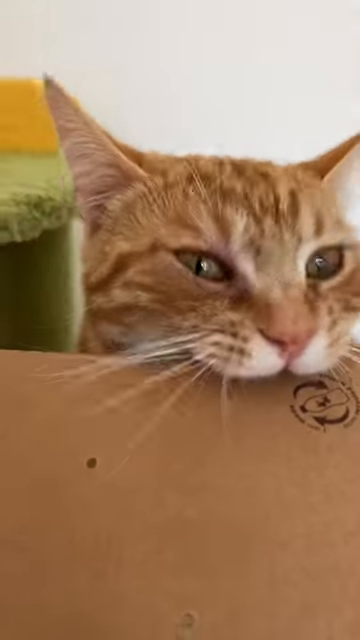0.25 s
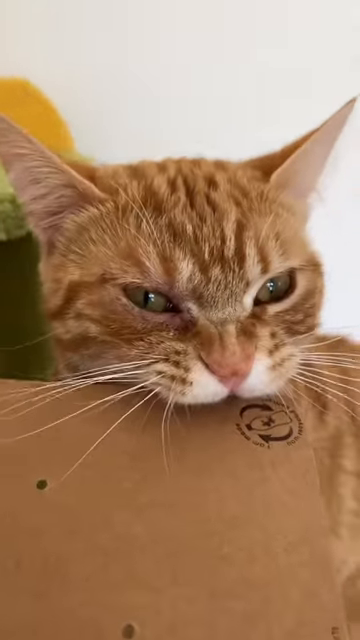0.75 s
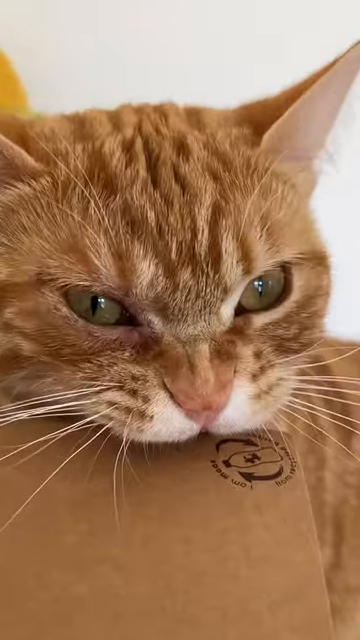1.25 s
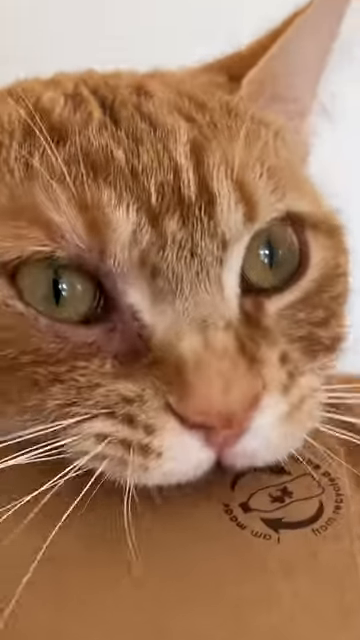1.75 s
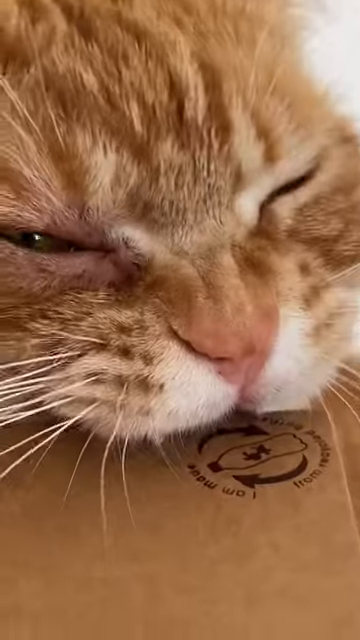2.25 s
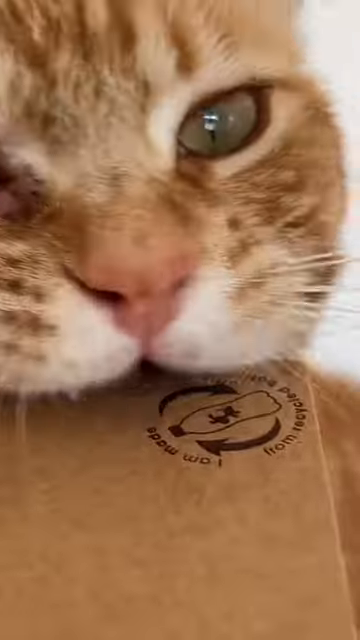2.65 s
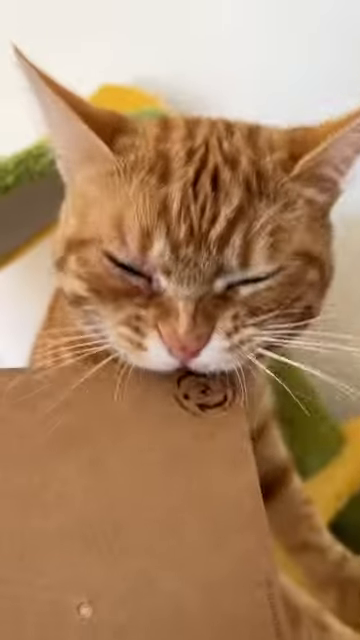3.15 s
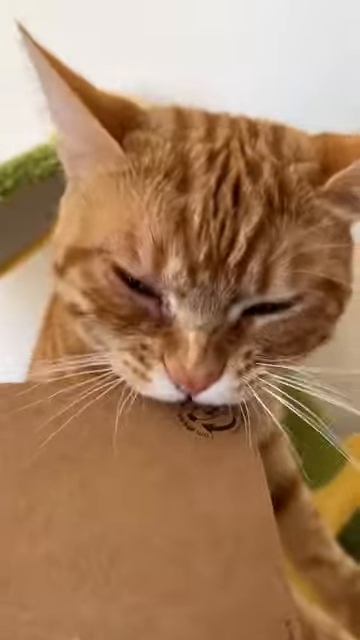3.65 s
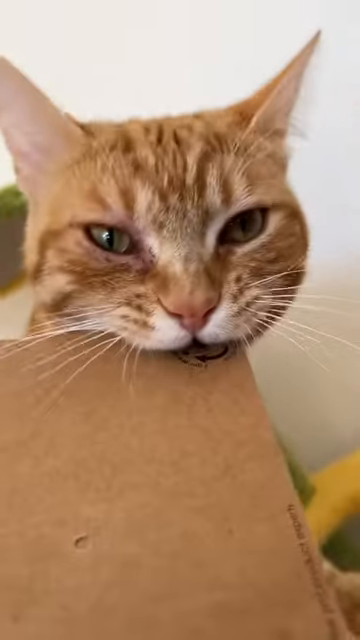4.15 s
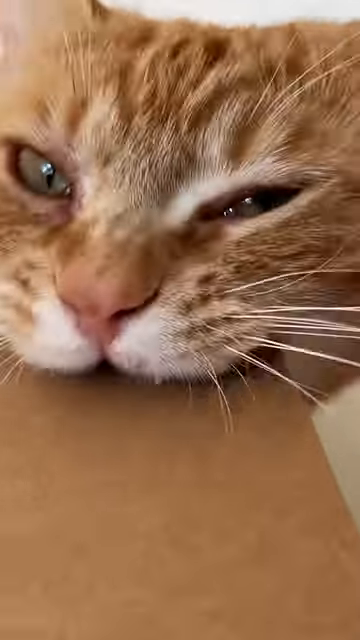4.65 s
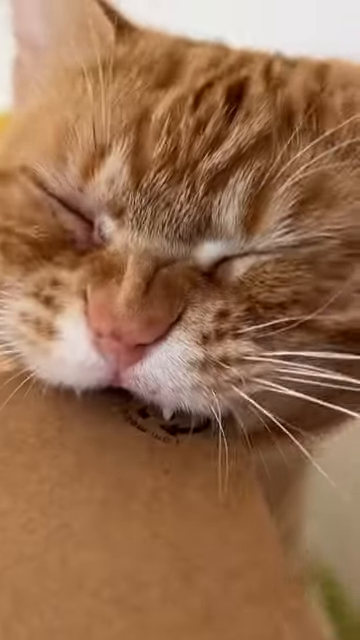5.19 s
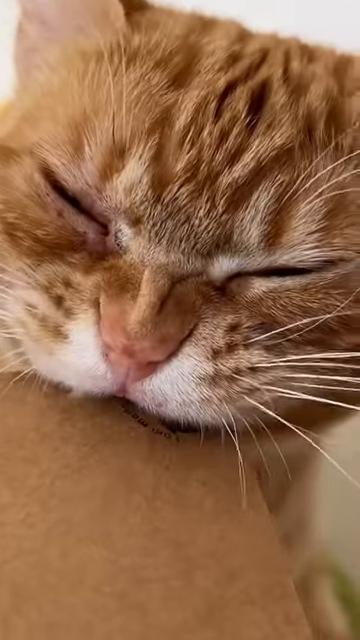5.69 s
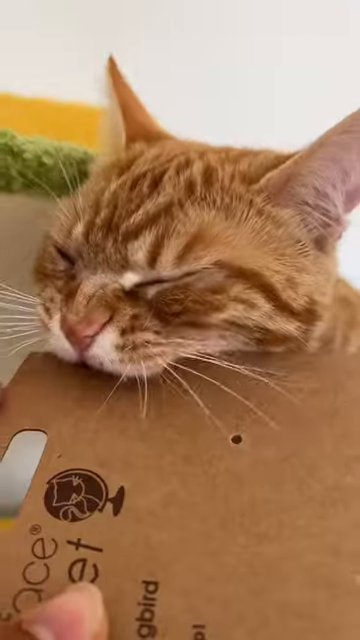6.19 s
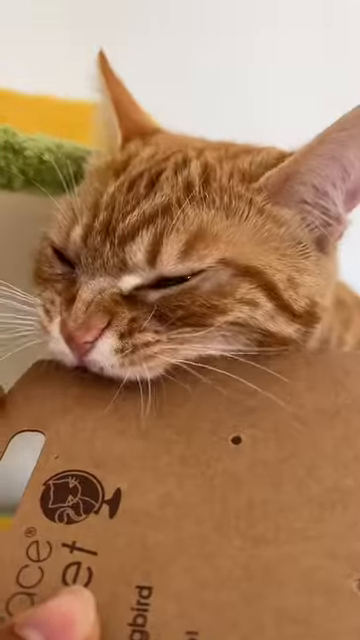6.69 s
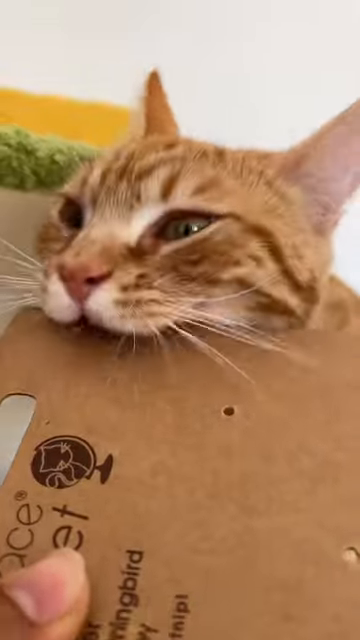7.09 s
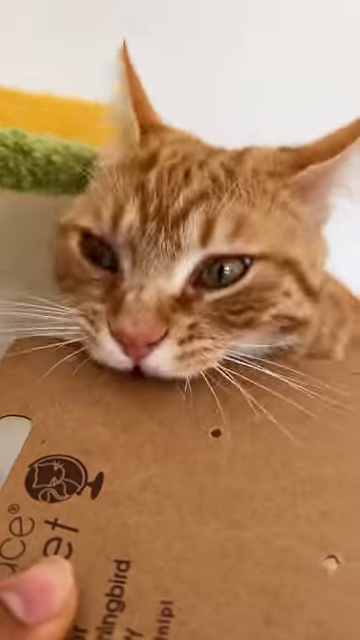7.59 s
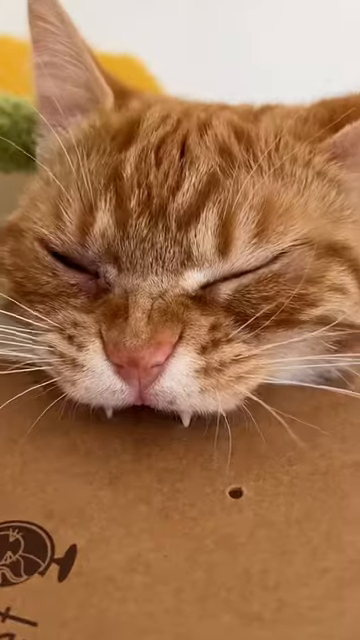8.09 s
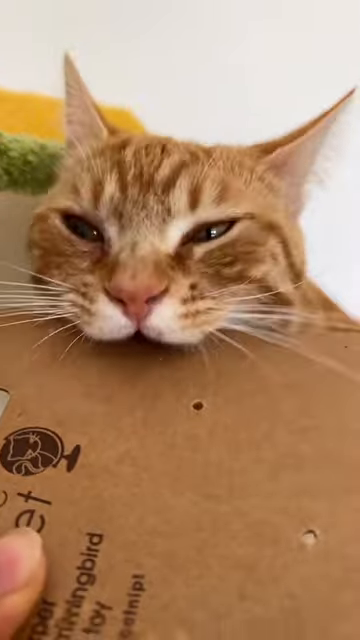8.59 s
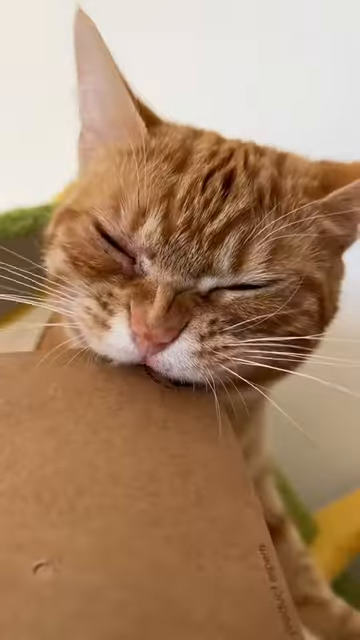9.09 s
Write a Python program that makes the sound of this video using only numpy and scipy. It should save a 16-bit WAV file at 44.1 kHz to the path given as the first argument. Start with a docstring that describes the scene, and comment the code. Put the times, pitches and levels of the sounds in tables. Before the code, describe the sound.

A cat gnaws the edge of a stiff cardboard sheet, hollow knocks giving way to scraping and bursts of crunchy tearing in a quiet room.

```python
"""A small room, where a cat chews the edge of a stiff cardboard sheet held close to a phone.
Teeth knock the sheet: filtered, dispersed impulses give the knock, the crack and a low flexing thump.
Teeth also drag over the paper and tear its fibres: random fractures and friction noise, spectrally shaped.
Fur scuffs the board as soft grainy noise, and the held sheet rumbles as the jaw pulls it.
A short reverberant tail and a faint diffuse hush lie behind."""
import sys
import numpy as np
from scipy import signal
from scipy.fft import rfft, irfft, next_fast_len
from scipy.io import wavfile
from scipy.ndimage import uniform_filter1d, map_coordinates

SR = 44100
rng = np.random.default_rng(int(sys.argv[2]) if len(sys.argv) > 2 else 0)


def store_pcm(level_fs):
    """Save levels as 16-bit WAV."""
    pcm = np.round(np.clip(level_fs, -1, 1) * 32767).astype(np.int16)
    wavfile.write(sys.argv[1], SR, np.atleast_2d(pcm).T)


N = 411894
TIME = np.arange(N) / SR  # s

# Teeth and chin striking the sheet. Each row: time in seconds, knock level in dB, knock centre in Hz,
# crack level in dB, thump level in dB, thump centre in Hz.
KNOCKS = [(0.2386, -28.5, 640, -49, -22.5, 101.3), (0.2531, -12.5, 1010, -28.5, -12.5, 149),
          (1.649, -45, 825, -51, -30, 103), (1.992, -14, 850, -31, -13, 166.5),
          (2.003, -13, 1106, -15, -17.5, 60), (2.8595, -11, 1090, -21.5, -23.5, 202),
          (3.995, -21, 543, -45, -16.5, 132), (4.011, -22, 710, -34, -16.5, 120),
          (4.026, -13, 1120, -22, -12.5, 125), (4.535, -18.5, 1110, -35, -25.5, 168),
          (4.545, -23, 578, -38.5, -15, 158), (4.579, -35.5, 851, -54, -20, 72.5),
          (4.8373, -16, 840, -32, -13, 158), (4.889, -20, 965, -31.5, -7, 103),
          (6.951, -37, 653, -39.5, -25.5, 93), (6.9953, -18.5, 514, -23, -17, 232),
          (7.004, -15.5, 725, -20, -19, 105), (7.056, -23.5, 430, -40, -24, 95),
          (7.402, -12, 559.7, -22, -18.5, 202), (7.412, -15, 1000, -24.5, -12, 90),
          (7.7415, -14.5, 1150, -25, -12, 115), (8.666, -20, 558, -34, -24, 142),
          (8.6806, -14.5, 1140, -23.5, -13.5, 128), (8.986, -16.5, 1106, -28, -26, 76)]
# Fibres giving way under a tooth. Each row: middle in seconds, length in seconds,
# crackle level in dB before a lift of 1 dB, thump level in dB.
RIPS = [(1.133, .006, -39.5, -43.5), (1.395, 0.0069, -35.5, -46.5), (3.492, 0.012, -31, -36.5),
        (3.682, .014, -42.5, -17.5), (5.412, 0.03, -20.5, -30.5), (5.461, .033, -22, -43),
        (5.498, 0.016, -13, -14.5), (5.625, 0.019, -18, -8), (5.715, 0.0076, -29.5, -29),
        (5.758, .011, -21.5, -17), (5.822, .012, -27.5, -46.5), (5.858, 0.013, -25, -32.5),
        (5.902, .017, -20.5, -28), (5.967, 0.016, -28.5, -38.5), (6.015, 0.089, -26, -42.5),
        (6.19, .011, -28, -26.5), (6.379, 0.033, -29.5, -33), (6.454, 0.013, -26.5, -42.5),
        (6.531, 0.019, -15.5, -33), (6.576, 0.026, -22, -28), (6.62, 0.0077, -14, -16.5),
        (8.816, 0.036, -23.5, -42.5), (8.86, 0.019, -15, -15), (8.987, 0.011, -17, -8.5),
        (9.076, 0.0088, -30, -31.5), (9.118, 0.0085, -21, -18.5), (9.185, 0.0087, -26.5, -48),
        (9.221, 0.0067, -26, -29.5), (9.261, 0.017, -19, -28.5)]
# Single fibres snapping. Each row: time in seconds, level in dB, centre in Hz before a tilt to the bass.
SNAPS = [(0.347, -49.5, 2770), (0.485, -50, 2650), (.715, -50.5, 4900), (.976, -48, 5270),
         (1.103, -38.5, 5950), (1.22, -41.5, 5930), (1.319, -46, 4470), (1.531, -48.5, 6450),
         (1.619, -43.5, 1805), (1.781, -35.5, 6770), (2.254, -48.5, 4970), (2.936, -42.5, 2770),
         (3.817, -50.5, 6840), (4.095, -36, 3160), (4.196, -42, 1760), (4.406, -45.5, 7300),
         (4.634, -35.5, 2160), (5.626, -18.5, 3100), (5.898, -27.5, 3830), (5.966, -29, 6340),
         (6.04, -27.5, 8440), (6.183, -26, 5400), (6.23, -34.5, 4320), (6.292, -28, 3480),
         (6.784, -51.5, 3040), (7.0043, -20, 4900), (7.26, -45.5, 4220), (7.595, -32, 5000),
         (7.844, -31, 2710), (7.969, -31, 2640), (8.415, -44.5, 2150), (8.781, -29.5, 3810),
         (9.258, -22.5, 5210)]
# Teeth dragging over the paper face. Each row: start, hardest moment and end in seconds,
# level in dB before a lift of 3.5 dB, lower resonance in Hz, its gain in dB before the depth of colouring,
# upper resonance in Hz, its gain in dB likewise, judder in dB per unit of wobble.
DRAGS = [(0.625, 1.047, 1.4, -56.5, 2720, 5, 5550, 9, 11),
         (2.951, 3.057, 3.09, -45, 2320, 14.5, 4300, 1.5, -0.5),
         (3.164, 3.232, 3.45, -38, 2460, 9.5, 7650, -11, 0),
         (4.285, 4.354, 4.42, -60.5, 2350, 13.5, 5800, 4, 0),
         (4.644, 4.665, 5.1, -49.5, 2240, 17.5, 5800, -5, 7),
         (4.94, 5.094, 5.12, -48.5, 2110, 9.5, 4600, 3, 2),
         (5.11, 5.195, 5.43, -34.5, 2246, 14, 7400, 14, 1),
         (6.162, 6.508, 6.64, -39, 2410, 6.5, 4320, 11, 5),
         (7.01, 7.03, 7.16, -45, 2400, -17, 5380, 5, 0.5),
         (7.96, 8.055, 8.36, -28, 2360, 12.5, 4300, -2, 1)]
# The jaw clamping down. Each row: start, hardest moment and end in seconds, fibre crackle in dB
# before a lift of 2.5 dB, rumble of the pulled sheet in dB before a lift of 1 dB.
BITES = [(0.038, 0.057, 0.09, -56, -48), (0.592, 0.698, .8, -59.5, -38.5), (0.812, 1.1, 1.22, -53.5, -34.5),
         (1.25, 1.33, 1.546, -60.5, -35), (1.775, 1.805, 1.9, -64.5, -45), (2.22, 2.39, 2.423, -53, -35.5),
         (2.65, 2.69, 2.73, -53.5, -37), (3.107, 3.3, 3.49, -41, -39.5), (3.55, 3.604, 3.69, -60, -42),
         (3.804, 3.9, 3.97, -62, -40.5), (4.1, 4.66, 4.74, -61, -43.5), (5.12, 5.424, 5.72, -39, -41.5),
         (5.62, 5.925, 6.145, -39, -41), (6.16, 6.398, 6.58, -40.5, -39.5),
         (7.25, 7.56, 7.68, -59.5, -44.5), (7.86, 8.098, 8.48, -49.5, -46.5),
         (8.948, 9.301, 9.92, -35.5, -38)]
# The muzzle brushing along the sheet. Each row: middle in seconds, length in seconds, level in dB,
# centre of the passed band in Hz.
RUBS = [(.246, 0.0072, -27, 735), (0.504, 0.17, -56, 1240), (1.64, 0.028, -40, 1000),
        (2.382, 0.017, -36.5, 496), (2.683, 0.038, -23, 527), (2.846, 0.023, -26.5, 710),
        (4.08, 0.081, -43.5, 1200), (4.689, 0.071, -47, 1460), (7.054, .055, -27.5, 450),
        (7.127, 0.12, -40, 580), (7.355, 0.11, -51.5, 694), (7.623, 0.024, -32, 1020),
        (7.68, 0.025, -31, 614), (8.494, 0.041, -42.5, 1550)]
# Lingering modes of the sheet. Each row: frequency in Hz, level against the knock in dB, t60 in seconds.
SHEET_MODES = [(213.6, -12.5, 0.12), (1048, -17, 0.13), (1645, -18.5, 0.033)]

# Relative spectra of the struck board, its crack, the fibres, the torn layers, the paper face, the fur,
# the pulled sheet and the hush. Each row: frequency in Hz, density in dB per Hz.
BOARD_SPECTRUM = [(150, 11), (220, 2.5), (330, 1.5), (500, 3), (700, -8), (1030, 1.5), (1300, -7),
                  (1640, -4), (2300, -10.5), (2900, -10.5), (6000, -23)]
CRACK_SPECTRUM = [(1200, -32), (2400, 13), (3000, -2), (5600, 3.5), (8000, -10.5), (12000, -18.5),
                  (16000, -30.5)]
FIBRE_SPECTRUM = [(300, -6), (1000, 1), (1800, 2), (2700, 7), (3500, -0.5), (4400, -1.5), (5000, -5.5),
                  (5900, 4.5), (8800, -5), (11700, 1), (12800, -11.5), (15800, -26)]
TORN_SPECTRUM = [(120, 3), (300, 0), (450, 4), (650, -0.5), (950, 3.5), (1300, -9), (1700, 4),
                 (3000, -21.5)]
PAPER_SPECTRUM = [(200, -1), (700, -10), (1500, 0.5), (2500, 4.5), (3400, 1.5), (4500, -0.5), (5200, -0.5),
                  (6200, -2.5), (8000, -15.5), (9000, -18), (11000, -14), (13000, -48)]
FUR_SPECTRUM = [(80, 2.5), (280, 2), (500, -5.5), (1000, -11), (2000, -13), (3500, -15.5), (7000, -13.5),
                (12000, -35.5)]
RUMBLE_SPECTRUM = [(20, -30), (42, 7), (65, 7.5), (115, 0), (170, -10), (280, -24), (600, -54),
                   (2000, -72.5)]
AIR_SPECTRUM = [(60, -10), (150, 4.5), (400, 5), (800, -7.5), (2400, -9), (3600, -15), (6000, -18.5),
                (8700, -30), (11500, -42), (13500, -32.5), (16000, -58)]

# The sheet shifting across the microphones. Each row: time in seconds, left over right in dB.
LEAN = [(1.8, .3), (2.5, .7), (2.8, 2.4), (3.3, .7), (3.7, 0)]
# Stereo difference. Each row: frequency in Hz, side against mid in dB.
SIDE_LEVEL = [(100, -67), (400, -24), (1200, -39), (4500, -12), (8000, -18.5), (12000, -7)]
# Reverberation. Each row: frequency in Hz, t60 in seconds.
ROOM_DECAY = [(100, 0.235), (400, 0.68), (2500, 0.38), (7000, 0.23), (14000, 0.13)]
# Reflection colour. Each row: frequency in Hz, relative reflected level in dB.
WALL_COLOUR = [(60, -53), (250, -1.5), (800, -0.5), (3000, 2.5), (7000, 6.5), (14000, 2.5)]

TOP_HZ = 16100  # upper band limit
BLOW_S, BLOW_SAMPLES = 0.01, 8192  # a blow's dB is its energy spread over BLOW_S; its buffer length
# Torn body lies between a rip's crackle and thump: offset, share of the way.
TORN_DB, TORN_DEPTH = -3.5, 0.42
# Thump pitch at this level; a weaker rip moves less sheet and sounds higher.
SPRING_HZ, SPRING_DB, SPRING_OCTAVES_PER_DB = 73.7, -12.5, 0.015
# Fall towards both ends of a stroke; how fast a tooth sets down and lifts.
DRAG_SAG_DB, DRAG_EDGE_DB_PER_S = 12, 447
# Width of the lower resonance; its climb over one stroke.
GRIP_OCTAVES, GRIP_RISE_OCTAVES = 0.13, 0.065
# Tabulated stroke level at that width; a stroke harder by the second value is twice as broad.
GRIP_DB, GRIP_DOUBLING_DB = -32.5, 24
# Fall towards both ends of a bite; how fast the jaw takes hold and lets go.
BITE_SAG_DB, BITE_EDGE_DB_PER_S = 10, 202
# The sheet follows the jaw a little late and settles more slowly.
PULL_SAG_DB, PULL_EDGE_DB_PER_S, PULL_LAG_S = 4.5, 160, 0.025
REST_CRACKLE_DB, REST_RUMBLE_DB = -71, -49.5  # the sheet merely held between the teeth
# Width of a scuff at 1 kHz; higher scuffs are narrower by this power of pitch.
RUB_OCTAVES, RUB_NARROWING = 0.92, 0.45


def knocks():
    """Impact excitation: a tooth skids, catches with a crack, rings the board and flexes the sheet."""
    out, skid = np.zeros((2, N))
    crack = lambda hz: amp(along(CRACK_SPECTRUM, hz))
    for s, knock_db, knock_hz, crack_db, thump_db, thump_hz in KNOCKS:
        board = lambda hz: band(hz, knock_hz, octaves=1.05) * amp(along(BOARD_SPECTRUM, hz))
        flexure = lambda hz: band(hz, thump_hz, octaves=0.71)
        knock = blow(board, scatter=0.75, t60=0.018, lag_cycles=0.98) + ring()
        add(out, s, amp(knock_db) * knock)
        add(out, s, amp(crack_db) * blow(crack, scatter=0.79, t60=0.0084, lag_cycles=1.5))
        add(out, s, amp(thump_db) * blow(flexure, scatter=0.51, t60=0.1, lag_cycles=1.4))
        skid += amp(knock_db - 19) * swell(s, length=0.017)
    return out + skid * coloured(grains(rate=1500, hiss=0.85), BOARD_SPECTRUM)


def rips():
    """Fracture and elastic release: a tooth ploughs through fibres and the freed sheet springs back."""
    crackle_power, body_power, thumps = np.zeros((3, N))
    for s, length, crackle_db, thump_db in RIPS:
        burst = swell(s, length) ** 2 * BLOW_S / length  # a longer rip spreads its energy
        body_db = crackle_db + TORN_DEPTH * (thump_db - crackle_db) + TORN_DB
        crackle_power += amp(crackle_db) ** 2 * burst
        body_power += amp(body_db) ** 2 * burst
        thump_hz = SPRING_HZ * 2 ** (SPRING_OCTAVES_PER_DB * (SPRING_DB - thump_db))
        flexure = lambda hz: band(hz, thump_hz, octaves=0.47)
        add(thumps, s, amp(thump_db) * blow(flexure, scatter=0.24, t60=0.13, lag_cycles=1.347))
    fibres = amp(1.0) * np.sqrt(crackle_power) * coloured(grains(rate=5000, hiss=0.46), FIBRE_SPECTRUM)
    fibres *= unit(amp(2.8 * wobble(350)))  # fibres give way in bundles
    body = np.sqrt(body_power) * coloured(grains(rate=3000, hiss=0.37), TORN_SPECTRUM)
    return gripped(fibres, depth=0.94) + body + thumps


def snaps():
    """Brittle fracture: a single stiff fibre breaks with a dry, broadband tick."""
    out = np.zeros(N)
    for s, db, pitch_hz in SNAPS:
        tick = lambda hz: band(hz, pitch_hz, octaves=0.93) / np.sqrt(hz / pitch_hz + 0.1)
        add(out, s, amp(db) * blow(tick, scatter=1.3, t60=0.0081, lag_cycles=1.8))
    return out


def drags():
    """Stick-slip friction: a tooth slides over paper, juddering as the grip changes."""
    pressure, judder = np.zeros(N), wobble(110)
    for start, hardest, end, db, *resonances, judder_db in DRAGS:
        stroke = arch(start, hardest, end, DRAG_SAG_DB, DRAG_EDGE_DB_PER_S)
        pressure += amp(db) * stroke * unit(amp(judder_db * judder))
    friction = coloured(grains(rate=5100, hiss=0.98), PAPER_SPECTRUM)
    return amp(3.5) * pressure * gripped(friction, depth=0.89)


def chewing():
    """Load-driven fracture: bites crackle in clumps with stray ticks, and the pulled sheet rumbles."""
    effort, pull = np.zeros(N), np.full(N, amp(REST_RUMBLE_DB))
    for start, hardest, end, crackle_db, rumble_db in BITES:
        clamp = arch(start, hardest, end, BITE_SAG_DB, BITE_EDGE_DB_PER_S)
        late = np.array([start, hardest, end]) + PULL_LAG_S
        tug = arch(*late, PULL_SAG_DB, PULL_EDGE_DB_PER_S)
        effort = np.maximum(effort, amp(crackle_db + 2.5) * clamp)
        pull = np.maximum(pull, amp(rumble_db + 1) * tug)
    clumps = grains(rate=1000, hiss=1.0) * amp(4.4 * wobble(78))
    crackle = (effort + amp(REST_CRACKLE_DB)) * coloured(clumps, FIBRE_SPECTRUM)
    ticks = amp(-26) * effort ** 0.6 * coloured(grains(rate=55, hiss=0), FIBRE_SPECTRUM)
    rumble = pull * coloured(rng.standard_normal(N), RUMBLE_SPECTRUM)
    return gripped(crackle + ticks, depth=0.45) + rumble


def rubs():
    """Distributed light friction: fur brushing the board gives a soft, dull, grainy scuff."""
    out, t = np.zeros(N), np.arange(SR // 2) / SR
    hairs = grains(rate=1500, hiss=0.96)
    for s, length, db, centre_hz in RUBS:
        width = RUB_OCTAVES * (1000 / centre_hz) ** RUB_NARROWING
        start = max(s - t[-1] / 2, 0)
        tone = lambda hz: amp(along(FUR_SPECTRUM, hz)) * (amp(-16.0) + band(hz, centre_hz, width))
        scuff = unit(filtered(hairs[round(start * SR):][:len(t)], tone))
        add(out, start, amp(db) * scuff * np.exp(-2 * ((start + t - s) / length) ** 2))
    return out


def blow(response, scatter, t60, lag_cycles):
    """Bending-wave dispersion: treble arrives first, bass later, then echoes from the edges."""
    t, hz = np.arange(BLOW_SAMPLES) / SR, np.fft.rfftfreq(BLOW_SAMPLES, 1 / SR)
    echoes = rng.standard_normal(BLOW_SAMPLES) * amp(-60 * t / t60) * (1 - np.exp(-10 * t / t60))
    push = 1 + scatter * rfft(echoes / np.linalg.norm(echoes))
    dispersion = np.exp(-2j * np.pi * lag_cycles * np.log(hz + 1))  # delay falls as 1 / frequency
    wave = irfft(push * response(hz) * dispersion)
    half = BLOW_SAMPLES // 2
    wave[half:] *= np.linspace(1, 0, half) ** 2
    return wave / np.linalg.norm(wave) * np.sqrt(BLOW_S * SR)


def ring():
    """Modal decay: lingering sheet modes, slightly different at every point of contact."""
    t = np.arange(BLOW_SAMPLES) / SR
    hz, db, t60 = np.transpose(SHEET_MODES)[:, :, None]
    detune, level = rng.standard_normal((2, *hz.shape))
    sines = np.sin(2 * np.pi * hz * (1 + 0.018 * detune) * t)
    return np.sum(sines * amp(db + 2.3 * level - 60 * t / t60), axis=0)


def gripped(x, depth):
    """Resonant filtering: fibres vary in tone, and two resonances of the grip colour them in a drag."""
    hz, t, z = signal.stft(x, SR, nperseg=512)
    gain = np.ones(z.shape)
    for start, hardest, end, db, lower_hz, lower_db, upper_hz, upper_db, judder_db in DRAGS:
        held = np.interp(t, [start - 0.04, start, end, end + 0.058], [0, 1, 1, 0])
        climb = 2 ** (GRIP_RISE_OCTAVES * np.interp(t, [start, end], [-0.5, 0.5]))
        width = GRIP_OCTAVES * 2 ** ((db - GRIP_DB) / GRIP_DOUBLING_DB)
        lower = amp(lower_db) * band(hz[:, None], lower_hz * climb, width)
        upper = amp(upper_db) * band(hz[:, None], upper_hz, octaves=0.075)
        gain += depth * held * (lower + upper)
    gain *= amp(2.4 * patches(z.shape))
    # Colour changes, level does not.
    keep = np.linalg.norm(z, axis=0) / (np.linalg.norm(z * gain, axis=0) + 1e-12)
    return signal.istft(z * gain * keep, SR, nperseg=512)[1][:N]


def grains(rate, hiss):
    """Shot noise: tiny fractures of uneven size, rate per second, over smooth friction noise."""
    size = amp(5 * np.clip(rng.standard_normal(N), -2, 2))
    breaks = (rng.random(N) < rate / SR) * rng.choice([-1, 1], N) * size
    return unit(unit(breaks) + hiss * rng.standard_normal(N))


def arch(start, hardest, end, sag_db, edge_db_per_s):
    """Effort envelope: force sets in, swells to its hardest moment, eases and lets go."""
    away = np.interp(TIME, [start, hardest, end], [-1, 0, 1])
    outside = np.abs(TIME - np.clip(TIME, start, end))
    return amp(-sag_db * away ** 2 - np.minimum(edge_db_per_s * outside, 100))


def swell(s, length):
    """Gaussian envelope: a bell in time about s."""
    return np.exp(-2 * ((TIME - s) / length) ** 2)


def wobble(rate):
    """Slow modulation: a smooth random curve, rate knots a second."""
    return map_coordinates(rng.standard_normal(int(N * rate / SR) + 4), [TIME * rate])


def patches(shape):
    """Random modulation: a smooth field over frequency and time, rms 1."""
    smooth = uniform_filter1d(rng.standard_normal(shape), 5, axis=0)
    return unit(uniform_filter1d(smooth, 12, axis=1))


def amp(db):
    """Logarithmic level: decibels to gain."""
    return 10 ** (np.asarray(db) / 20)


def unit(x):
    """Normalisation: scale to rms 1."""
    return x / np.sqrt(np.mean(x ** 2) + 1e-20)


def along(points, hz):
    """Interpolation of (Hz, value) points along a logarithmic frequency axis."""
    f, v = np.transpose(points)
    return np.interp(np.log(hz + 1), np.log(f), v)


def band(hz, centre_hz, octaves):
    """Band-pass response: a bell on the log-frequency axis."""
    return np.exp(-0.5 * (np.log2((hz + 1) / centre_hz) / octaves) ** 2)


def filtered(x, response):
    """Linear filtering: the spectrum of x times a response of frequency."""
    n = x.shape[-1]
    m = next_fast_len(n + BLOW_SAMPLES)
    return irfft(rfft(x, m) * response(np.fft.rfftfreq(m, 1 / SR)), m)[..., :n]


def coloured(x, spectrum):
    """Spectral shaping: x filtered by a (Hz, dB) curve, at rms 1."""
    return unit(filtered(x, lambda hz: amp(along(spectrum, hz))))


def add(track, s, sound):
    """Superposition: mix a sound in at time s."""
    part = track[round(s * SR):][:len(sound)]
    part += sound[:len(part)]


def ports(x):
    """Spatial decorrelation: two close microphones share bass; treble differs as head and sheet move."""
    hz, t, z = signal.stft(x, SR, nperseg=512)
    shifted = 1j * z * patches(z.shape) * amp(along(SIDE_LEVEL, hz))[:, None]
    side = signal.istft(shifted, SR, nperseg=512)[1][:N]
    return np.array([x + side, x - side])


def room(x):
    """Reverberation: the room answers each microphone with its own decaying noise tail."""
    hz, t, z = signal.stft(rng.standard_normal((2, SR // 2)), SR, nperseg=256)
    decay = amp(-60 * t / along(ROOM_DECAY, hz)[:, None])
    tail = signal.istft(z * decay, SR, nperseg=256)[1]
    tail = filtered(tail / np.linalg.norm(tail[0]), lambda f: amp(along(WALL_COLOUR, f)))
    delayed = np.pad(x, (round(0.0057 * SR), 0))  # 5.7 ms before the first reflection
    return signal.fftconvolve(delayed[None], tail, axes=1)[:, :N]


def hush():
    """Diffuse field: independent steady noise in each channel."""
    return amp(-61.5) * coloured(rng.standard_normal((2, N)), AIR_SPECTRUM)


def scene():
    """Superposition of the chewing close by, the room behind it and a faint diffuse hush."""
    cat = knocks() + rips() + snaps() + drags() + rubs() + chewing()
    lean_db = np.interp(TIME, *np.transpose(LEAN))
    direct = ports(cat) * amp([lean_db / 2, -lean_db / 2])
    return direct + amp(-21.0) * room(cat) + hush()


def record(dry):
    """Saturation and band-limiting: the phone rounds the highest peaks and passes nothing above TOP_HZ."""
    rounded = dry / (1 + np.abs(dry) ** 6) ** (1 / 6)
    return filtered(rounded, lambda hz: hz < TOP_HZ)


dry = scene()
out = record(dry)
store_pcm(out)
```